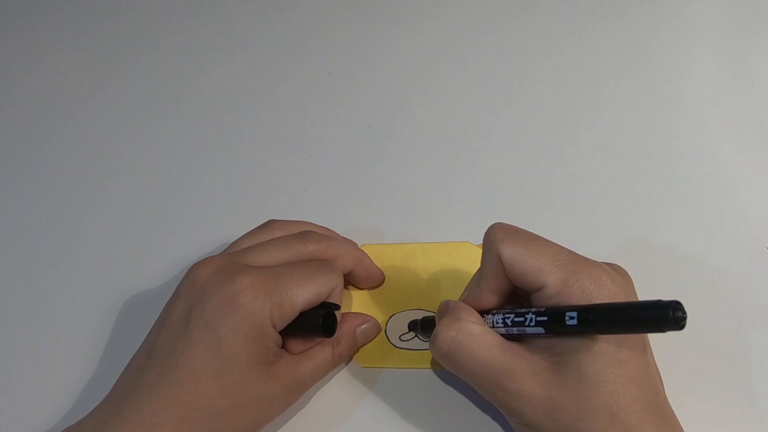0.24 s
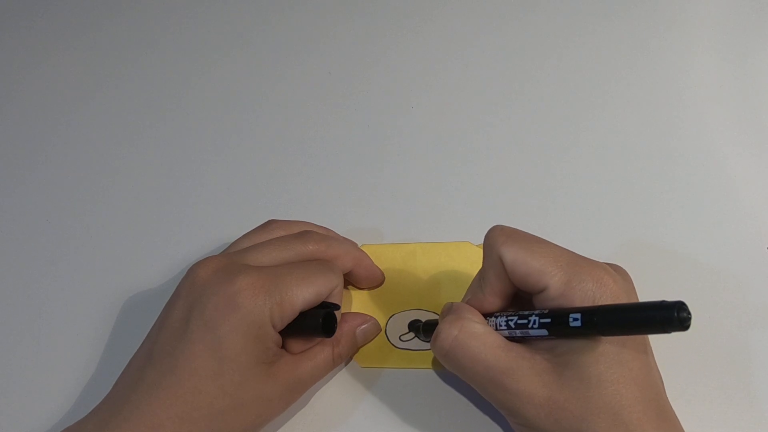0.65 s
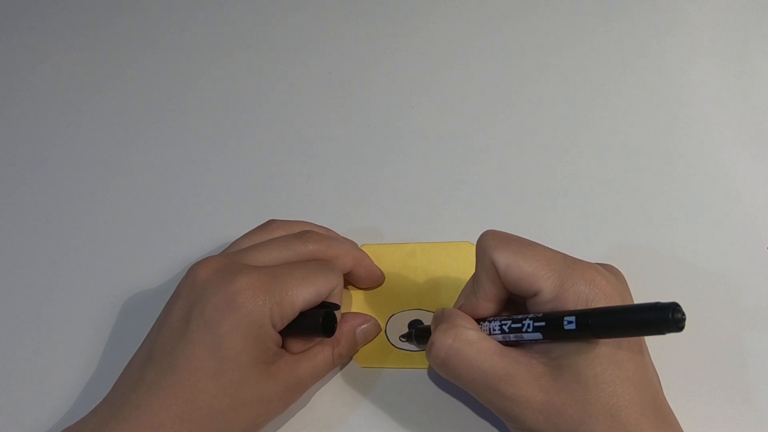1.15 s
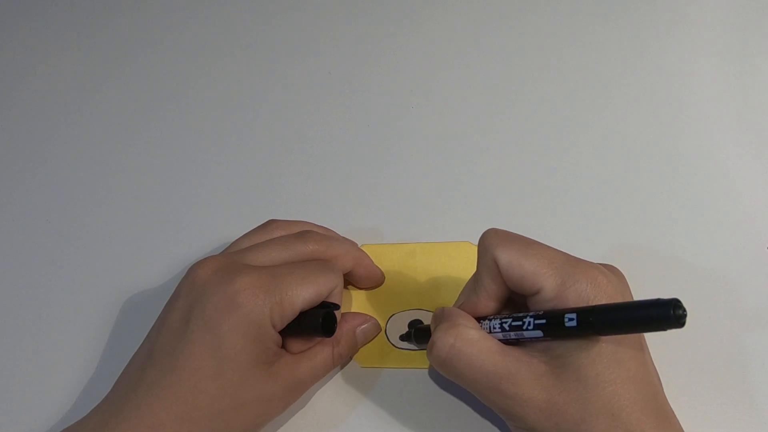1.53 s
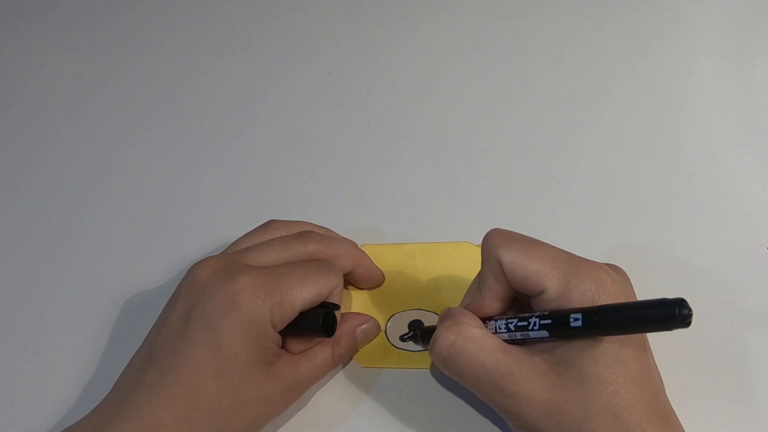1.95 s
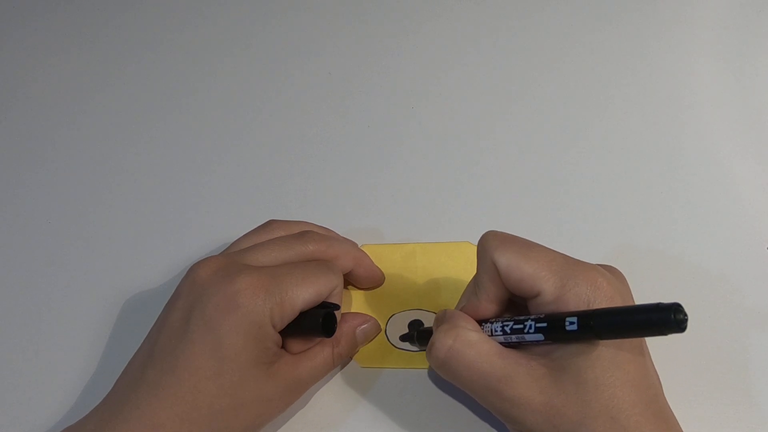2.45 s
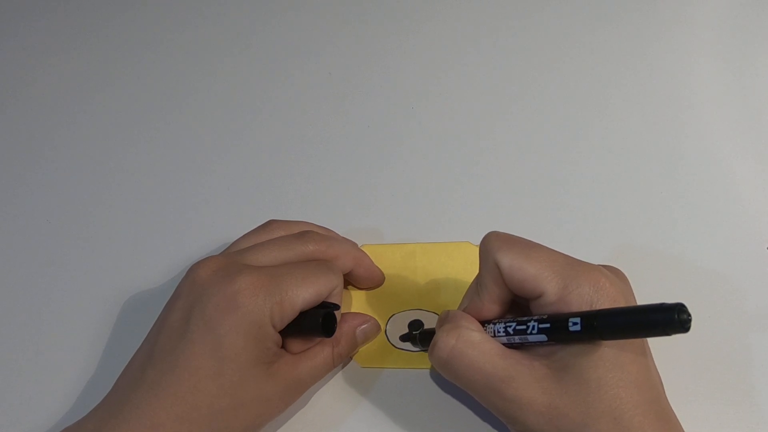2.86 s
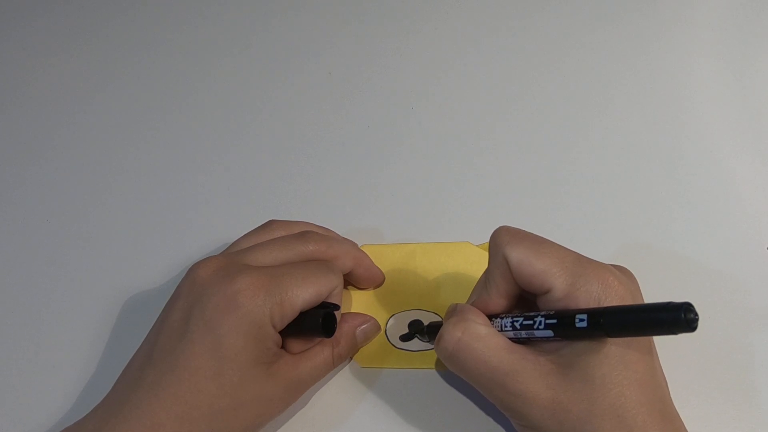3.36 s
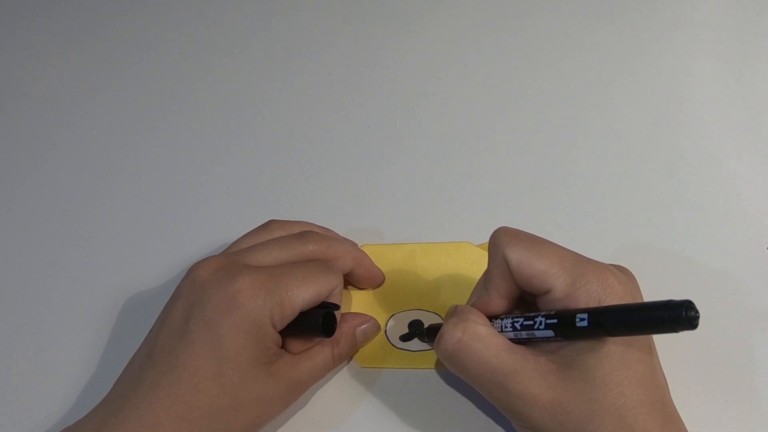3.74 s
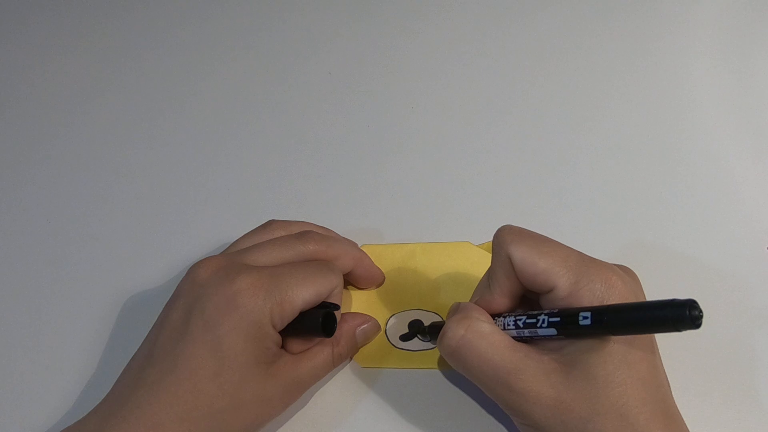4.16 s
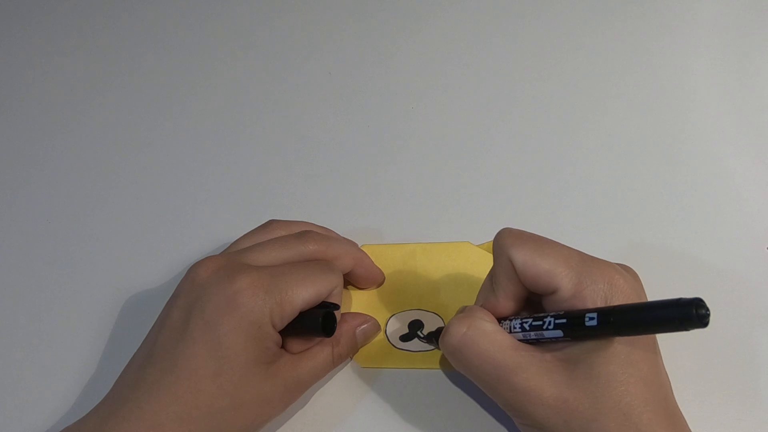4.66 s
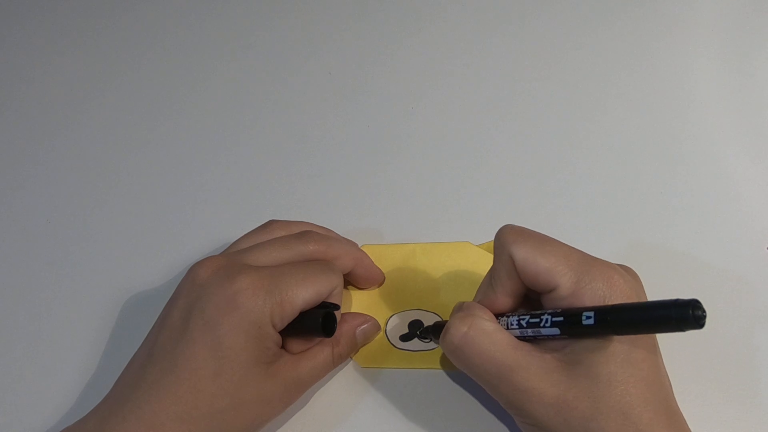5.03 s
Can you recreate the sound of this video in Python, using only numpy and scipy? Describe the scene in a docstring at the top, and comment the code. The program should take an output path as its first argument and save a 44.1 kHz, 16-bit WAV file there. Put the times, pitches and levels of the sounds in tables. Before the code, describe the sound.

Close, dry marker strokes colour in a shape on paper, while a hand slides and gently thumps the table underneath.

```python
"""A felt-tip marker colours in a small shape on paper that lies on a table, in a quiet room.
Each stroke drags the felt over paper fibres: a grainy hiss in the air and a hollow murmur through
the table. The tip ticks as it lands or catches. Now and then the hand slides over the table or bumps
it softly. The microphone is close by, so it picks up the table's shaking as a low rumble."""
import sys
import numpy as np
from scipy import signal
from scipy.fft import rfft, irfft, next_fast_len
from scipy.io import wavfile

SR = 44100
rng = np.random.default_rng(int(sys.argv[2]) if len(sys.argv) > 2 else 0)


def log_audio(samples):
    """Write samples as a 16-bit WAV file to the path given in sys.argv[1]."""
    # one column per channel
    frames = np.atleast_2d(samples).T
    # limit to full scale, then quantise
    limited = np.clip(frames, -1, 1)
    pcm = np.round(limited * 32767).astype(np.int16)
    wavfile.write(sys.argv[1], SR, pcm)


N = 233431
TIME = np.arange(N) / SR
FFT_SIZE = next_fast_len(N, real=True)
FREQS = np.fft.rfftfreq(FFT_SIZE, 1 / SR)

# Levels in all tables are relative: each function adds its own gain.
# marker strokes: start/s, length/s, level/dB, brightness/(dB per octave)
STROKES = [(-0.03, 0.14, -60.5, 0), (0.095, 0.21, -50, 0), (0.218, 0.16, -55, -0.5), (0.73, 0.14, -63, 0.5),
           (1.159, 0.11, -69.5, -0.5), (1.905, 0.19, -60, 1), (2.164, .105, -58, 5.5),
           (2.29, 0.09, -50, 2.5), (2.399, 0.1, -51.5, 2.5), (2.51, 0.078, -50, 1.5), (2.604, .1, -57, 2),
           (2.728, 0.081, -57, 0.9), (2.831, .105, -63.5, 3), (2.971, 0.11, -52, 1.1),
           (3.048, 0.12, -69, 1.5), (3.184, .11, -63.5, 4), (3.296, 0.095, -64.5, 3), (3.399, 0.1, -64, 3),
           (3.49, 0.086, -68, 10), (3.616, 0.083, -69.5, -0.5), (4.447, 0.11, -70, 0), (4.549, 0.2, -69, 0),
           (4.664, 0.17, -65, 0.5), (4.888, 0.096, -65, 12.5), (4.928, 0.11, -61, 0),
           (5.07, .11, -64.5, 0.5), (5.192, 0.098, -63, 6)]
LIGHT_STROKE_DB = -60
# hiss of the felt in a quick flick: f/Hz, level/dB
FLICK_TONE = [(700, -48.5), (1300, 0), (2100, -9.5), (2800, -9), (3450, -0.5), (3900, -3.5), (4320, 5),
              (5090, -2.5), (6000, -4.5), (7200, -3), (8300, -20), (10300, -34), (12400, -28.5),
              (15000, -45)]
# hiss of the felt in a slow, heavy drag: f/Hz, level/dB
HEAVY_TONE = [(700, -17.5), (1300, -7), (1900, -8.5), (2150, -4), (2380, -1.5), (2800, -2.5), (3450, 4.5),
              (4000, -0.5), (4400, -3), (5100, -5), (6500, -4), (7300, -18.5), (8200, -33.5), (12400, -47),
              (15000, -62)]
# hollow tone of sound that travels through the table: f/Hz, level/dB
HOLLOW_TONE = [(60, -30), (130, 3), (200, 5), (340, -15), (520, -14.5), (660, -3.5), (850, 3), (990, -13),
               (1130, -0.5), (1270, -12.5), (1800, -18.5), (2600, -43.5), (5000, -50.5), (10000, -78.5)]
# how alike left and right are for the hiss: f/Hz, likeness (-1 to 1)
HISS_LIKENESS = [(1500, -0.43), (2600, 0.61), (4000, 0.98), (6000, 0.52), (8000, -0.075)]
# the same for sound through the table: f/Hz, likeness (-1 to 1)
TABLE_LIKENESS = [(200, -0.79), (800, -0.9), (1200, -0.9), (1600, -0.2), (2000, 0.24)]


def gain_of(db):
    """Turns decibels into a number to multiply by."""
    return 10 ** (np.asarray(db) / 20)


def unit_level(x):
    """Scales a signal to an average level (rms) of 1."""
    return x / np.sqrt(np.mean(x ** 2) + 1e-20)


def curve_at(points, hz):
    """Joins points by straight lines on a log-frequency axis."""
    f, value = np.transpose(points)
    return np.interp(np.log(hz + 1), np.log(np.sort(f) + 1), value)


def colour(x, tone, size=8192):
    """Filters x to the given tone; white noise keeps its overall level."""
    db = np.maximum(curve_at(tone, abs(np.fft.fftfreq(size, 1 / SR))), -100)
    response = np.exp(np.conj(signal.hilbert(np.log(gain_of(db)))))  # no sound ahead of its cause
    taps = np.fft.ifft(response).real[:size // 2]
    return signal.fftconvolve(np.atleast_2d(x), taps[None] / np.linalg.norm(taps), axes=1)[:, :N]


def ring(x, hz, width_hz):
    """Lets x ring at one pitch; a narrower ring lasts longer."""
    r = np.exp(-np.pi * width_hz / SR)
    return 2 * signal.lfilter([1 - r], [1, -r * np.exp(2j * np.pi * hz / SR)], x).real


def stereo(x, likeness):
    """Blends two unrelated signals into a left and right that are partly alike."""
    same = np.clip(curve_at(likeness, FREQS), -1, 1)
    mid, side = rfft(x, FFT_SIZE) * np.sqrt([(1 + same) / 2, (1 - same) / 2])
    return irfft(np.array([mid + side, mid - side]), FFT_SIZE)[:, :N]


def lean_right(x, right_db):
    """Leans a sound to the right and scales its centre to level 1."""
    x = x * gain_of([[-right_db / 2], [right_db / 2]])
    return x / np.sqrt(np.mean(x.mean(0) ** 2))


def rocking(x, left_db):
    """The shaking table moves the microphone's two sides in opposite directions."""
    return x * np.array([[-gain_of(left_db)], [1]])


def wander(rate_hz):
    """A random wobble of level 1, mostly slower than rate_hz."""
    slow = rfft(rng.standard_normal(FFT_SIZE)) / (1 + (FREQS / rate_hz) ** 4)
    return unit_level(irfft(slow, FFT_SIZE)[:N])


def hump(peak_s, rise_s, fall_s, edge=2):
    """A smooth swell and fade; a higher edge makes the start steeper."""
    distance = (TIME - peak_s) / np.where(TIME < peak_s, rise_s, fall_s)
    near = abs(distance) < 5
    shape = np.zeros(N)
    shape[near] = np.exp(-abs(distance[near]) ** np.where(distance[near] < 0, edge, 2))
    return shape


def friction(per_s, spread_db, smooth=1.0):
    """Fibres or skin catch and snap free: many tiny clicks over a smooth rub."""
    size = gain_of(spread_db * np.minimum(rng.exponential(1, (2, N)), 4))
    snaps = size * rng.choice([-1, 1], (2, N)) * (rng.random((2, N)) < per_s / SR)
    return unit_level(unit_level(snaps) + smooth * rng.standard_normal((2, N)))


def felt_hiss(tone, stroke_power, peaks_db, pivot_hz=4300):
    """Paper fibres snap under the felt and make a hiss; each stroke sets its level and brightness."""
    # narrow fixed peaks that colour the hiss, as from nearby reflections: f/Hz, width/Hz, level/dB
    hiss_peaks = [(3630, 50, -5), (3700, 48, -13), (3730, 23, -10.5), (4520, 58, -29.5), (5630, 38, 6.5),
                  (5500, 19, -15), (6100, 33, -13), (5280, 10, -23), (6040, 10.3, 11), (6376, 83, 0.5)]
    rub = colour(friction(per_s=5000, spread_db=3, smooth=0.91), tone)
    peaks = sum(gain_of(db) * ring(rub, hz, width) for hz, width, db in hiss_peaks)
    rub = rub + gain_of(peaks_db) * peaks
    spectrum = rfft(lean_right(stereo(rub, HISS_LIKENESS), right_db=1.5), FFT_SIZE)
    level_db, brightness = np.transpose(STROKES)[2:]
    # brightness tips four bands like a seesaw about the pivot
    octaves = np.log2(np.geomspace(2000, 9000, num=4) / pivot_hz)
    hiss = 0
    for octave, share in zip(octaves, np.eye(len(octaves))):
        band_shape = np.interp(np.log2((FREQS + 1) / pivot_hz), octaves, share)
        band = irfft(spectrum * band_shape, FFT_SIZE)[:, :N]
        hiss = hiss + band * np.sqrt(gain_of(level_db + brightness * octave) ** 2 @ stroke_power)
    return hiss


def table_murmur(rub):
    """The hollow murmur that rubbing makes in the table top, at level 1."""
    # upper rings of the table top: f/Hz, width/Hz, level/dB
    upper_rings = [(871, 8.2, -3), (1048, 40, -8), (2080, 510, -1.5)]
    murmur = colour(rub, HOLLOW_TONE)
    murmur = murmur + sum(gain_of(db) * ring(murmur, hz, width) for hz, width, db in upper_rings)
    return unit_level(stereo(murmur, TABLE_LIKENESS))


def rasp(speed, flick):
    """Near top speed a hard flick tears fibres loose, and they crackle far up in the treble."""
    # the crisp top of a flick: f/Hz, level/dB
    rasp_tone = [(3000, -21), (7000, -3), (9000, 4), (12500, -2), (15000, -8)]
    level_db, brightness = np.transpose(STROKES)[2:]
    rasp_db = -101 + 1.6 * (level_db - LIGHT_STROKE_DB) + 1.9 * brightness
    crackle = colour(friction(per_s=1200, spread_db=6, smooth=0.5), rasp_tone)
    return crackle * (gain_of(rasp_db) @ (speed ** 2 * flick))


def marker(grip_db=1.28, flick_brightness=1.13, press_s=0.035):
    """Strokes swell and fade with the tip's speed; bright ones are flicks, dull ones heavy drags."""
    # the tip bears down and grates in the table top: t/s, level/dB
    presses = [(.04, -72), (.135, -46.5), (.787, -47), (1.19, -56.5)]
    grip = gain_of(grip_db * wander(rate_hz=55))  # the felt grips unevenly
    speed = np.array([hump(start + 0.45 * length, 0.41 * length, 0.38 * length, edge=2.5) ** 2
                      for start, length, *_ in STROKES])
    level_db, brightness = np.transpose(STROKES)[2:]
    flick = (1 + np.tanh((brightness[:, None] - flick_brightness) / 2)) / 2  # 0 drag, 1 flick
    hiss = gain_of(-2.5) * felt_hiss(HEAVY_TONE, speed * (1 - flick), peaks_db=-5)
    hiss += gain_of(-3) * felt_hiss(FLICK_TONE, speed * flick, peaks_db=6)
    murmur_db = -53.5 + 0.36 * (level_db - LIGHT_STROKE_DB)  # grows more slowly than the hiss
    pressing = sum(gain_of(db) * hump(t, press_s, press_s) for t, db in presses)
    murmur_level = np.sqrt(gain_of(murmur_db) ** 2 @ speed + pressing ** 2)
    murmur = murmur_level * table_murmur(friction(per_s=1500, spread_db=0.5))
    return grip * (hiss + rasp(speed, flick) + gain_of(-2.5) * murmur)


def room(air_db=-60.5, drone_db=-58, waver_db=4.5):
    """Faint steady air and microphone hiss, with a wavering low drone that the table picks up."""
    # the air of the room: f/Hz, level/dB
    air_tone = [(20, -4), (55, -7.5), (105, -21), (160, 2), (240, -3), (420, -20), (820, -20.5),
                (1400, -27.5), (2830, -32.5), (5300, -31.5), (6400, -26.5), (7400, -28.5), (8300, -40),
                (12200, -47), (15000, -55.5)]
    # how alike left and right are for the air: f/Hz, likeness (-1 to 1)
    air_likeness = [(100, 0.45), (1500, 0.14), (3000, 0.26), (8000, 0)]
    # the room's drone through the table: f/Hz, level/dB
    drone_tone = [(40, -26.5), (110, -22.5), (165, -1), (220, -6.5), (320, -22.5), (510, -24), (640, -15.5),
                  (850, -17), (1020, -27.5), (1150, -26), (2000, -36), (3500, -57), (10000, -89.5)]
    air = stereo(colour(rng.standard_normal((2, N)), air_tone), air_likeness)
    drone = unit_level(colour(rng.standard_normal(N), drone_tone))
    drone *= gain_of(waver_db * wander(rate_hz=7.4))
    return gain_of(air_db) * lean_right(air, right_db=2) + gain_of(drone_db) * rocking(drone, left_db=0.5)


def ticks(fade_s=0.0021):
    """Short dry snaps as the tip lands or catches, heard through air and table."""
    # ticks of the tip: t/s, level/dB
    tip_ticks = [(.124, -43), (.746, -42), (0.781, -44), (0.812, -49), (2.291, -50), (2.451, -38),
                 (2.518, -46), (2.751, -40)]
    bursts = sum(gain_of(db) * np.exp(-abs(TIME - t) / fade_s) * (TIME >= t) for t, db in tip_ticks)
    snaps = bursts * rng.standard_normal((2, N))
    in_air = stereo(colour(snaps, FLICK_TONE), HISS_LIKENESS)
    in_table = stereo(colour(snaps, HOLLOW_TONE), TABLE_LIKENESS)
    return gain_of(-8) * in_air + gain_of(-10) * in_table


def table_ringing(push):
    """A pushed table rings on at its own low pitches."""
    # the table's own notes: f/Hz, level/dB, time to fade by 60 dB/s
    notes = [(161.9, 12, 0.16), (201, 8, 0.1), (226.5, 4.5, 0.088), (283, 13, 0.14), (422, 13.5, 0.13)]
    return sum(gain_of(db) * ring(push, hz, np.log(1000) / np.pi / fade_s) for hz, db, fade_s in notes)


def hand_slides(attack_s=0.028, release_s=0.03, jerk_db=1):
    """Skin slips in small jerks: a low rumble, mostly on the right, a hum in the table, a faint hiss."""
    # the heel of the hand slides over the table: start/s, length/s, level/dB
    slides = [(0.235, 0.041, -56.5), (0.761, 0.094, -54), (0.873, 0.24, -47.5), (1.337, 0.14, -57),
              (2.744, 0.12, -60), (4.435, 0.18, -58), (4.586, .18, -59.5), (4.888, 0.1, -53)]
    # rumble of the hand on the table: f/Hz, level/dB
    rumble_tone = [(15, -58), (30, -8), (47, 3), (62, -5), (85, -10), (106, 0.5), (130, -23.5), (215, -6.5),
                   (320, -43), (410, -23), (560, -44.5), (1200, -79)]
    level = np.zeros(N)
    for start, length, db in slides:
        rise = np.clip((TIME - start) / attack_s, 0, 1)
        fall = np.exp(-np.maximum(TIME - start - length, 0) / release_s)
        level += gain_of(db) * rise * fall
    level *= gain_of(jerk_db * wander(rate_hz=71))
    slips = friction(per_s=330, spread_db=1)
    right, left = unit_level(colour(slips, rumble_tone))
    rumble = gain_of(7.5) * np.array([gain_of(-18.5) * left, right])
    push = colour(slips[0], HOLLOW_TONE)[0]
    hum = gain_of(-6) * rocking(unit_level(table_ringing(push)), left_db=-7.5)
    murmur = gain_of(-14) * table_murmur(slips)
    skin_hiss = gain_of(-29) * stereo(colour(slips, HEAVY_TONE), HISS_LIKENESS)
    return level * (rumble + hum + murmur + skin_hiss)


def bumps(rebound_s=0.026, wood_fade_s=0.04):
    """The bumped table shudders, rebounds and rings on; loose contact rattles at the height of it."""
    # soft bumps: peak t/s, level/dB, f/Hz, swell/s, fade/s, rattle level against the bump/dB
    soft_bumps = [(1.072, -34, 85.5, 0.0094, 0.039, -39), (1.4428, -16, 187.7, 0.014, 0.0028, -19),
                  (2.0963, -30, 197, 0.0079, 0.0049, -29.5), (2.3662, -15, 211.3, .011, 0.0051, -22.5),
                  (2.702, -35, 67.6, 0.0091, 0.0066, -24), (2.803, -26.5, 234, 0.003, 0.0073, -11)]
    # the knock of loose contact: f/Hz, level/dB
    rattle_tone = [(120, -1), (290, -8), (400, 4), (520, -5.5), (700, -4.5), (840, 2.5), (960, -17),
                   (1160, 3.5), (1300, -7), (1520, -13), (1800, -54), (5000, -100)]
    shudder, rattle_level = np.zeros(N), np.zeros(N)
    for t, db, hz, swell, fade, loose_db in soft_bumps:
        shudder += gain_of(db) * hump(t, swell, fade) * np.cos(2 * np.pi * hz * (TIME - t))
        dying_in_wood = gain_of(-13) * np.exp(-abs(TIME - t) / wood_fade_s) * (TIME > t)
        contact = hump(t - fade / 2, swell, fade, edge=7.4)
        rattle_level += gain_of(db + loose_db) * (contact + dying_in_wood)
    rattle = colour(rattle_level * rng.standard_normal((2, N)), rattle_tone)
    rattle = gain_of(-8) * stereo(rattle, TABLE_LIKENESS)
    ringing = gain_of(-7) * table_ringing(shudder + gain_of(6) * rattle[1])
    rebound = gain_of(-19) * np.interp(TIME - rebound_s, TIME, shudder)
    return rocking(shudder + rebound + ringing, left_db=-13.5) + rattle


def scene():
    """Marker, hand and table in the quiet room."""
    return marker() + ticks() + bumps() + hand_slides() + room()


def record(dry):
    """Cuts away the treble above 15000 Hz."""
    low_pass = signal.firwin(511, 15000, window=("kaiser", 9), fs=SR)
    return signal.oaconvolve(dry, low_pass[None], "same")


dry = scene()
out = record(dry)
log_audio(out)
```